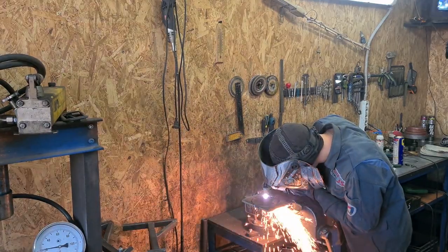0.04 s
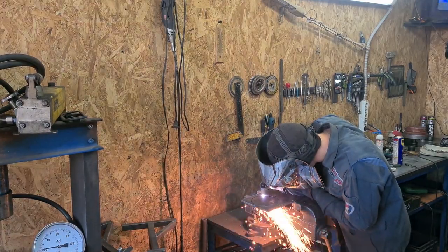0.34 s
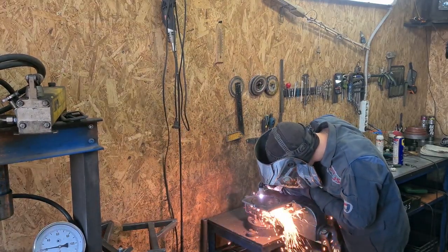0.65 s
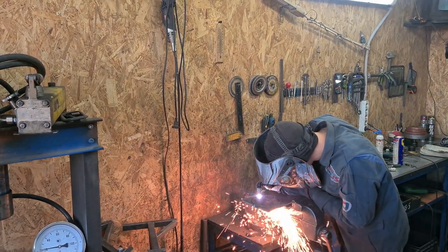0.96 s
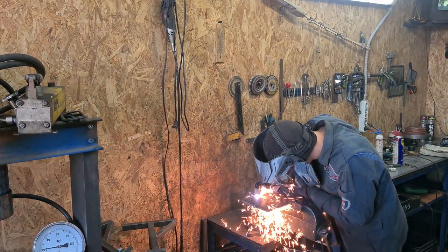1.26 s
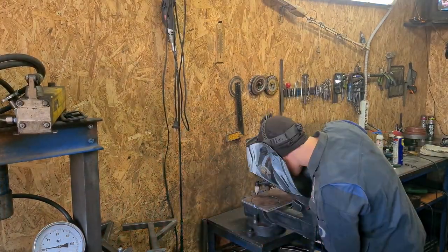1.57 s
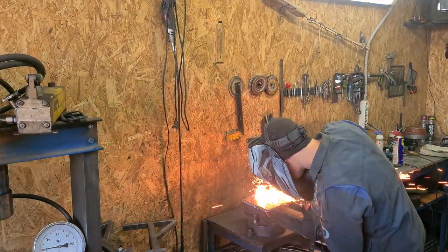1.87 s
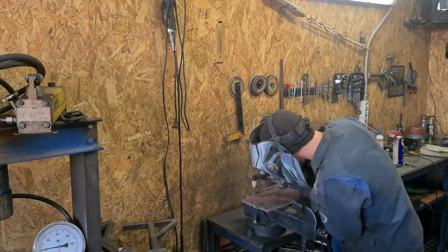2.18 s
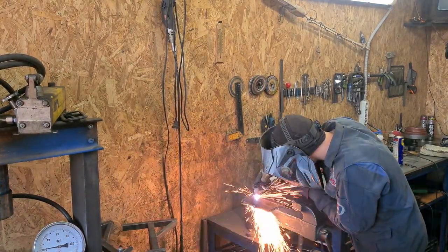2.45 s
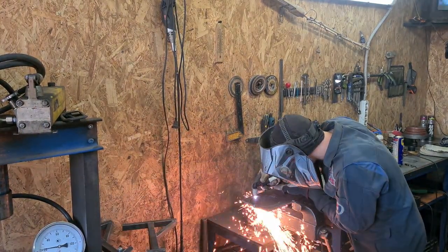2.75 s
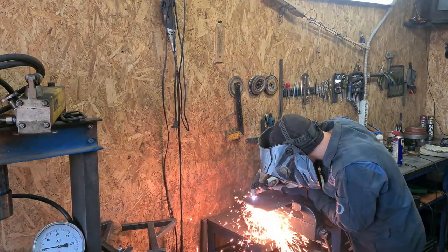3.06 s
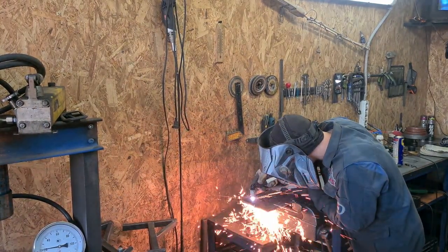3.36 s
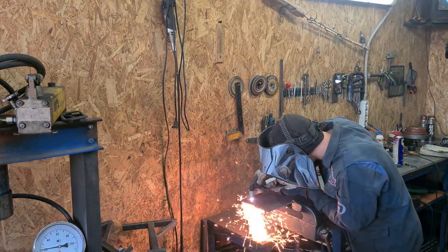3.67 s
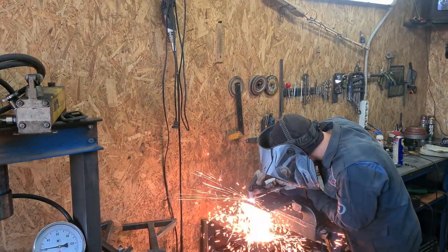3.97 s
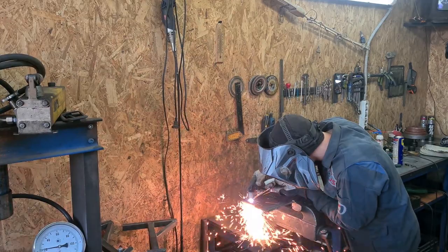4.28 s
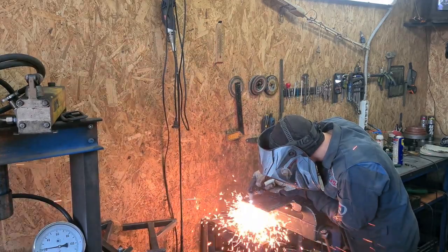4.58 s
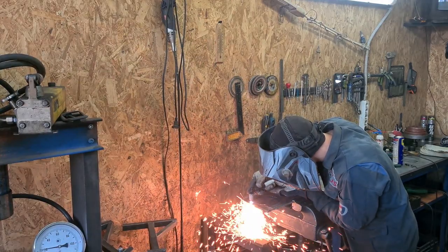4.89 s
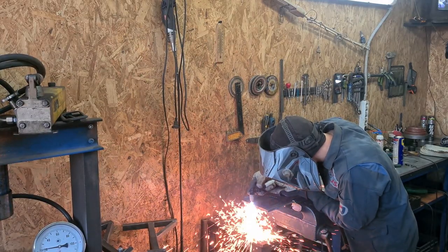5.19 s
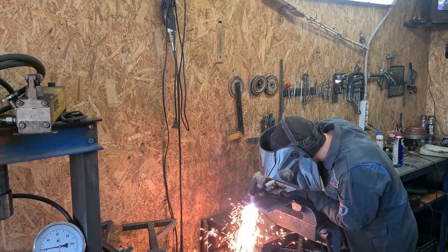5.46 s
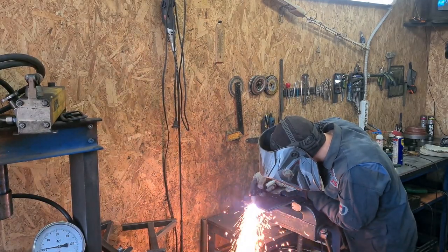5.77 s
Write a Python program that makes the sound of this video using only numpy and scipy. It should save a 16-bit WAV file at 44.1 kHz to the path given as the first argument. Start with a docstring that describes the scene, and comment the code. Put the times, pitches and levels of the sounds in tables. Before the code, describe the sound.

A hand-held plasma torch cuts steel with a loud, bright hiss and fine crackling sparks. The arc soon dies, leaving air that hisses, chokes and puffs as the tip touches the plate. With a dry spit the arc catches again, and a low rumble grows under the cut with gusts and a couple of thumps. Near the end a faint machine hum joins. The sound is close, in a small workshop.

```python
"""A hand-held plasma torch cuts thick steel in a small board-lined workshop: the air jet hisses,
roars in the kerf and spits sparks. At 1.2 s the arc dies, and the tip chokes the bare air as it is
reset on the plate. At 2.5 s the arc catches and bites again, and the blast under the plate rumbles
more and more, with gusts and thumps. From 4.6 s a machine, likely the air compressor, hums along."""
import sys
import numpy as np
from scipy import signal
from scipy.fft import rfft, irfft, next_fast_len
from scipy.io import wavfile

SR = 44100
rng = np.random.default_rng(int(sys.argv[2]) if len(sys.argv) > 2 else 0)


def persist_wave(psi):
    """Save psi, clipped to +-1, as 16-bit WAV."""
    counts = np.round(np.clip(psi, -1, 1) * 32767).astype(np.int16)
    wavfile.write(sys.argv[1], SR, np.atleast_2d(counts).T)


N = 261513
SIZE = 2 * next_fast_len(N // 2 + SR // 4)
TIME, FREQS = np.arange(N) / SR, np.fft.rfftfreq(SIZE, 1 / SR)
BASS_LEAD_RAD = 1.16  # right ear ahead of the left


def gain_of(db):
    """Decibels to amplitude."""
    return 10 ** (np.asarray(db) / 20)


def unit_rms(x):
    """Scales to rms 1."""
    return x / np.sqrt(np.mean(x ** 2) + 1e-20)


def spectrum(points):
    """Points joined by straight lines on a log-frequency axis."""
    hz, value = np.transpose(points)
    return np.interp(np.log(FREQS + 1), np.log(hz + 1), value)


def automation(points):
    """Points joined by straight lines in time."""
    return np.interp(TIME, *np.transpose(points))


def ramp(s, length_s):
    """Rises from 0 to 1 around a moment."""
    return np.clip(.5 + (TIME - s) / length_s, 0, 1)


def swell(s, length_s):
    """A bell curve around a moment, half as high at the ends of its length."""
    return .5 ** ((2 * (TIME - s) / length_s) ** 2)


def swells(rows):
    """The summed gain of a table of swells."""
    return sum(gain_of(db) * swell(s, length) for s, length, db in rows)


def burst(s, rise_s, decay_s):
    """Envelope with a quick attack and an exponential decay."""
    age = np.maximum(TIME - s, 0)
    return (1 - np.exp(-age / rise_s)) * np.exp(-age / decay_s)


def shaped(x, gain):
    """Filters by a gain for each frequency, to rms 1."""
    return unit_rms(irfft(rfft(x, SIZE) * gain, SIZE)[..., :N])


def drift(rate_hz):
    """Random modulation that rolls off above a rate, rms 1."""
    return shaped(rng.standard_normal(N), (FREQS > 2) / (1 + (FREQS / rate_hz) ** 2))


def tone(hz, waver_hz, rate_hz):
    """A sine of rms 1 whose pitch wavers."""
    cycles = np.cumsum(hz + waver_hz * drift(rate_hz)) / SR
    return np.sqrt(2) * np.sin(2 * np.pi * (cycles + rng.random()))


def turbulence(colour, flicker_db, rate_hz):
    """Flow noise, unrelated at the two ears, whose strength flickers at both alike."""
    noise = shaped(rng.standard_normal((2, N)), gain_of(spectrum(colour)))
    return noise * gain_of(flicker_db * drift(rate_hz))


def ringing(modes):
    """Noise held in narrow resonances: fuzzy, wavering tones."""
    power = sum((gain_of(db) * unit_rms(1 / (1 + ((FREQS - hz) / width) ** 2))) ** 2
                for hz, width, db in modes)
    return np.sqrt(power.mean()) * shaped(rng.standard_normal((2, N)), np.sqrt(power))


def bass_image(x):
    """Long waves reach both ears partly alike, the right a little ahead."""
    # Each row: frequency in Hz, likeness of the ears from 0 to 1.
    likeness = [(30, 0.14), (85, 0.33), (160, 0.14), (300, 0.14)]
    same = spectrum(likeness)
    left, own = rfft(x, SIZE)
    right = same * left * np.exp(1j * BASS_LEAD_RAD) + np.sqrt(1 - same ** 2) * own
    return irfft(np.array([left, right]))[:, :N]


def arc_burning():
    """1 while the arc burns, 0 while only air flows; it catches fast and dies more slowly."""
    # Each row: start and end of a cut in seconds.
    cuts = [(-0.2, 1.24), (2.512, 6.2)]
    return sum(ramp(start, .008) * (1 - ramp(end, .13)) for start, end in cuts)


def workshop(x, early_db, sway_s, tail_db, t60):
    """Bench and walls return near echoes that shift as the hand moves, then a short tail."""
    wet = x.copy()
    for ear in (0, 1):
        for delay in rng.uniform(.001, .012, 6):
            sway = sway_s * np.sin(2 * np.pi * (rng.uniform(.1, .5) * TIME + rng.random()))
            index = np.round((TIME - delay - sway) * SR).astype(int)
            wet[ear] += gain_of(early_db) * x[ear, np.clip(index, 0, N - 1)]
    t = TIME[:SR // 2]
    tail = rng.standard_normal((2, len(t))) * gain_of(-60 * t / t60) * (t > .008)
    tail /= np.linalg.norm(tail[0])
    wet += gain_of(tail_db) * signal.fftconvolve(x, tail, axes=1)[:, :N]
    return unit_rms(wet) * np.std(x)


def compressor():
    """The motor comes in and holds: wavering tones over a ringing housing and a soft clatter."""
    # Each row: frequency in Hz, level in dB.
    clatter_colour = [(100, -21), (280, 0.5), (450, 1), (600, -5), (850, -2.5), (1050, 1.5), (1250, 6),
                      (1550, -2.5), (2500, -7), (5000, -30)]
    motor_tones = [(362, -53.5), (473, -57), (1210, -50.5), (1416, -55), (1992, -66), (2353, -61)]
    # Each row: frequency in Hz, width in Hz, level in dB.
    housing_modes = [(300, 10, -64), (365, 11, -50), (460, 9.6, -54), (1036, 20, -49), (1127, 22, -49.5),
                     (1217, 23, -52), (1992, 15, -60)]
    clatter = gain_of(-41) * turbulence(clatter_colour, flicker_db=1.5, rate_hz=83)
    whine = sum(gain_of(db) * tone(hz, waver_hz=2.9, rate_hz=22) for hz, db in motor_tones)
    pan_left = gain_of([[3], [-5]])
    running = gain_of(1.5) * ramp(4.59, length_s=.06)
    return running * (whine * pan_left + ringing(housing_modes) + clatter)


def thumps():
    """The blast breaks through the plate in short, low thumps."""
    # Each row: start in seconds, level in dB, pitch in Hz, decay in seconds.
    hits = [(2.892, -23, 54.3, 0.012), (4.646, -14.5, 85, 0.038)]
    return sum(gain_of(db) * burst(s, .0021, decay) * np.sin(2 * np.pi * (hz * TIME + rng.random((2, 1))))
               for s, db, hz, decay in hits)


def low_hum():
    """A low hum swells now and then under the cut."""
    # Each row: middle in seconds, length in seconds, level in dB, pitch in Hz.
    hums = [(3.195, 0.19, -32.5, 98), (3.37, 0.061, -35, 98), (3.81, 0.088, -31, 80),
            (4.95, 0.16, -31.5, 83), (5.113, 0.16, -30.5, 83), (5.565, .14, -32.5, 82),
            (5.81, 0.17, -29.5, 87.5)]
    hum = sum(gain_of(db) * swell(s, length) * tone(hz, waver_hz=7.4, rate_hz=10.6)
              for s, length, db, hz in hums)
    analytic = signal.hilbert(hum, SIZE)[:N]
    return np.array([analytic, analytic * np.exp(1j * BASS_LEAD_RAD)]).real


def puffs():
    """Choked air puffs out across the plate, sounding hollow in the gap under the tip."""
    # Each row: middle in seconds, length in seconds, level in dB.
    escapes = [(1.575, 0.16, -40), (1.71, 0.081, -49.5), (1.93, 0.036, -46.5), (2.04, 0.11, -44.5),
               (2.245, 0.08, -42.5)]
    # Each row: frequency in Hz, level in dB.
    colour = [(150, -5), (350, -7.5), (550, -5), (750, -2.5), (1120, 4), (1500, -1), (2200, -2),
              (5000, -33)]
    return swells(escapes) * gain_of(5) * turbulence(colour, flicker_db=2, rate_hz=40)


def plate_blast():
    """Air rushes over the steel, sets it ringing and gusts out below, more as the cut deepens."""
    # Each row: time in seconds, level of the blast in dB.
    growth = [(0, -60), (.9, -61), (1.3, -58.5), (1.55, -52.5), (2.0, -55.5), (2.45, -49.5), (2.7, -49),
              (3.4, -43.5), (4.2, -43), (4.7, -41.5), (5.36, -41.5), (5.44, -47), (5.55, -43.5),
              (5.93, -42)]
    # Each row: frequency in Hz, level in dB.
    rush_colour = [(150, -20), (320, -9.5), (480, -4), (640, -2.5), (800, -4.5), (950, -1), (1150, 5),
                   (1400, -2), (2200, -6.5), (5000, -18)]
    rumble_colour = [(40, -18), (65, -4.5), (85, 2.5), (105, -1), (130, -4.5), (175, -7), (250, -13.5),
                     (400, -22), (900, -50)]
    gust_colour = [(12, -6), (30, -4.5), (55, 2.5), (75, -10.5), (110, -22), (400, -47)]
    # Single gusts. Each row: middle in seconds, length in seconds, level in dB.
    buffets = [(.7, .06, -50), (1.15, 0.48, -56), (1.7, 0.17, -50), (2.15, .3, -51), (3.49, 0.047, -50),
               (3.84, .12, -34), (4.32, 0.11, -35), (4.52, 0.083, -36), (5.13, .07, -44)]
    blast_db = automation(growth)
    rush_db = -50 + arc_burning() * (8 + .28 * (blast_db + 35))  # follows the blast while cutting
    rush = gain_of(rush_db) * turbulence(rush_colour, flicker_db=3, rate_hz=35)
    rumble = gain_of(blast_db + 7) * turbulence(rumble_colour, flicker_db=1.5, rate_hz=17)
    # The ring of the plate. Each row: frequency in Hz, width in Hz, level in dB against the blast.
    plate_modes = [(474.5, 23, -12)]
    ring = gain_of(blast_db) * ringing(plate_modes)
    gust_level = (gain_of(blast_db + 1) + swells(buffets)) * gain_of(.5)
    gusts = gust_level * turbulence(gust_colour, flicker_db=.5, rate_hz=15)
    return rush + ring + bass_image(rumble + gusts + thumps())


def tip_spits():
    """Short dry spits as the tip touches, lifts or the arc catches."""
    # Each row: start in seconds, level in dB, decay in seconds.
    spits = [(1.41, -31.5, 0.011), (1.919, -31, 0.011), (2.514, -28, 0.01)]
    colour = [(250, -7), (700, -7), (1500, 3), (3800, -1), (6000, -12), (14000, -16)]
    level = sum(gain_of(db) * burst(s, .00076, decay) for s, db, decay in spits)
    return level * turbulence(colour, flicker_db=2.5, rate_hz=300)


def tip_choke_db(settle_s=.075, clear_s=.04):
    """The flow dips as the tip touches the plate, settles, and comes back when the tip lifts."""
    # Each row: start, end and closing time in seconds, held dip in dB, offset on touching in dB.
    contacts = [(1.395, 1.669, 0.045, -4.5, -10.5), (2.012, 2.103, .012, -8, -7),
                (2.11, 2.19, .04, -2.5, 1.5), (2.207, 2.295, 0.034, -5.5, -1)]
    dip_db = np.zeros(N)
    for start, end, closing, held, touch in contacts:
        touching = ramp(start, closing) * (1 - ramp(end, clear_s))
        settling = np.exp(-np.maximum(TIME - start, 0) / settle_s)
        dip_db += touching * (held + touch * settling)
    return dip_db


def bare_air():
    """Air alone hisses from the tip."""
    # Each row: frequency in Hz, level in dB.
    colour = [(1200, -25), (2200, -9.5), (3100, -2), (4600, -1.5), (6500, -6), (9000, -25)]
    return turbulence(colour, flicker_db=1, rate_hz=30)


def sparks(per_s, ring_s):
    """Molten drops burst left and right in tiny snaps."""
    onsets = (rng.random(N) < per_s / SR).astype(float)
    kind = rng.integers(0, 8, N)
    snaps = rng.standard_normal((8, 2, 256)) * np.exp(-TIME[:256] / ring_s)
    crackle = sum(signal.oaconvolve((onsets * (kind == k))[None], snap, axes=1)[:, :N]
                  for k, snap in enumerate(snaps))
    colour = [(200, -22), (700, -13), (3000, -3), (7000, 2), (9000, 2), (13000, -5)]
    return shaped(crackle, gain_of(spectrum(colour)))


def kerf_roar():
    """The jet roars in the slot and stirs hollow resonances of kerf and plate."""
    # Each row: frequency in Hz, level in dB.
    colour = [(400, -24.5), (1000, -14), (1400, -8), (1900, -2.5), (2300, -4), (3000, 0.5), (4500, -0.5),
              (5600, -2.5), (8000, -17.5)]
    # Each row: frequency in Hz, width in Hz, level in dB.
    hollow_modes = [(626, 74, -18), (1329, 75, -15.5), (2010, 18, -18.5), (3040, 140, -14.5)]
    return gain_of(3.5) * turbulence(colour, flicker_db=1.24, rate_hz=16) + ringing(hollow_modes)


def arc_hiss():
    """The arc's bright, flickering hiss."""
    # Each row: frequency in Hz, level in dB.
    colour = [(3500, -26), (5100, -10.5), (5900, -3), (7050, -1), (7900, -5), (9000, -8.5), (10500, -9),
              (14000, -71)]
    return gain_of(3) * turbulence(colour, flicker_db=.98, rate_hz=45)


def nozzle_sizzle(lit):
    """Air sizzles from the nozzle; the bore whistles, more softly while the arc burns."""
    # Each row: frequency in Hz, level in dB.
    colour = [(7500, -26.5), (10000, -11), (11000, -5.5), (12000, -2.5), (13400, -3), (14500, -5),
              (16000, -3)]
    # Each row: frequency in Hz, width in Hz, level in dB.
    bore_modes = [(7200, 110, -18), (11700, 320, -10), (15070, 40, -24)]
    bore = gain_of(-6 - 3.5 * lit) * ringing(bore_modes)
    return gain_of(5.5) * turbulence(colour, flicker_db=.95, rate_hz=50) + bore


def jet():
    """One air jet drives nozzle, arc, kerf and sparks, so they choke, surge and sputter together."""
    # How hard the jet bites into the kerf. Each row: time in seconds, lift of the roar in dB.
    bite = [(0, 9.5), (.6, 9), (.85, 10.5), (1.22, 9.5), (2.55, 8), (2.68, 8), (2.95, 10), (3.5, 9),
            (3.66, 6), (3.78, 10.5), (4.55, 10.5), (4.66, 8.5), (4.8, 10.5), (5.93, 8.5)]
    # The torch is moved. Each row: middle and length in seconds, lifts of sizzle, hiss and roar in dB.
    surges = [(1.314, 0.14, 1.5, -2, 4.5), (1.64, 0.092, -1.5, -1, 13.5), (1.713, 0.11, 3.5, 0.5, -3.5),
              (1.923, 0.055, 1.5, 2.5, 9.5), (1.984, 0.045, 3, 1, 6.5), (2.058, 0.067, 0, 1.5, 13),
              (2.283, 0.052, 0, 1, 11.5), (2.535, 0.032, 4.5, 4.5, 2.5), (2.575, .06, 4.5, -0.5, -1.5),
              (2.648, .04, 0, 5, 0), (3.113, 0.045, 2, 2.5, 0.5)]
    lit, choke_db, bite_db = arc_burning(), tip_choke_db(), automation(bite)
    sizzle_up, hiss_up, roar_up = sum(np.outer(lifts, swell(s, length)) for s, length, *lifts in surges)
    wander_db = lit * .42 * drift(3.6)
    sizzle_db = -27.5 - .06 * TIME - lit + choke_db + sizzle_up
    hiss_db = -32.5 + lit * (.66 + .17 * (bite_db - 10)) + choke_db + hiss_up + wander_db
    roar_db = -44 + lit * bite_db + .83 * choke_db + roar_up + wander_db
    nozzle = gain_of(sizzle_db) * nozzle_sizzle(lit)
    arc = gain_of(hiss_db) * arc_hiss()
    kerf = gain_of(roar_db) * kerf_roar()
    # The kerf whistles briefly. Each row: frequency in Hz, width in Hz, level in dB.
    whistle_modes = [(3100, 70, -33)]
    whistle = swell(3.172, length_s=.03) * ringing(whistle_modes)
    crackle = gain_of(roar_db - 2) * sparks(per_s=110, ring_s=.00035)
    air = (1 - lit) * gain_of(-35.5 + 1.1 * choke_db) * bare_air()
    sputter_db = .26 * drift(150)
    buzz_db = .8 * np.sin(2 * np.pi * 187.5 * TIME)  # a faint, even buzz on the hiss
    return (nozzle + arc + kerf + whistle + crackle + air) * gain_of(sputter_db + buzz_db)


def scene():
    """Torch and plate in the room, the compressor behind them; the treble leans right."""
    # Each row: frequency in Hz, left minus right in dB.
    balance = [(60, 5), (110, -3.5), (200, 1), (380, 0), (700, -1), (1290, 0), (2380, -2.0), (4400, -4.5),
               (8120, -2.5), (15000, -5.5)]
    torch = workshop(jet() + tip_spits(), early_db=-16, sway_s=.00015, tail_db=-16.5, t60=.11)
    mix = torch + puffs() + plate_blast() + low_hum() + compressor()
    pan = gain_of(np.outer([1, -1], spectrum(balance)) / 2)
    pan /= np.sqrt(np.mean(pan ** 2, axis=0))
    return irfft(rfft(mix, SIZE) * pan)[:, :N]


def record(dry):
    """A steep low-pass trims the very top of the sizzle."""
    lowpass = signal.firwin(1023, 15850, window=("kaiser", 9), fs=SR)
    return signal.oaconvolve(dry, lowpass[None], "same")


dry = scene()
out = record(dry)
persist_wave(out)
```